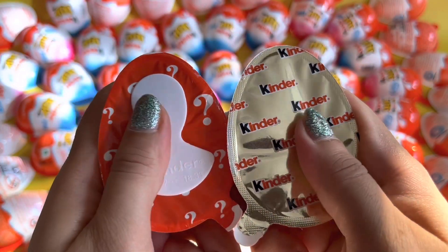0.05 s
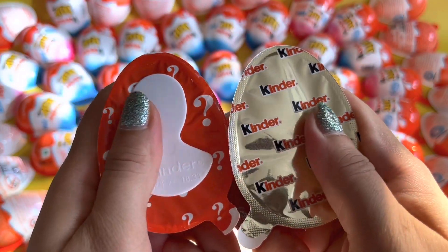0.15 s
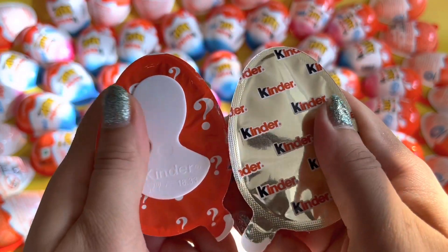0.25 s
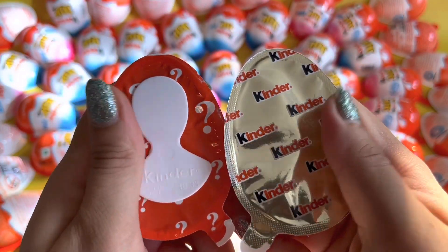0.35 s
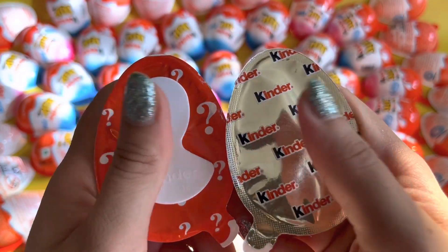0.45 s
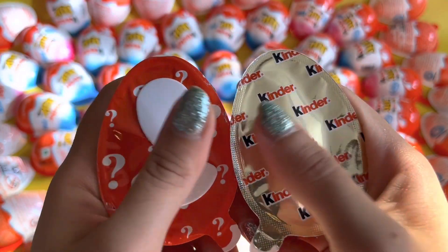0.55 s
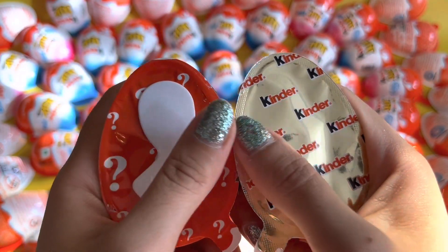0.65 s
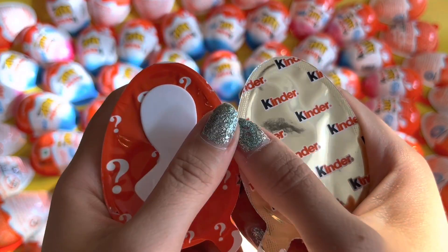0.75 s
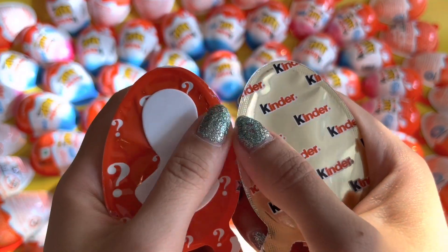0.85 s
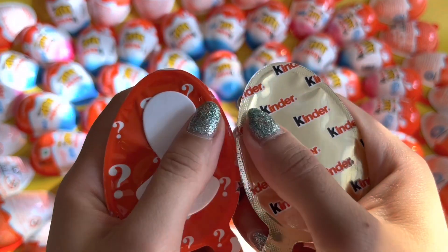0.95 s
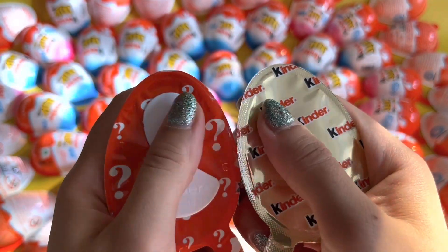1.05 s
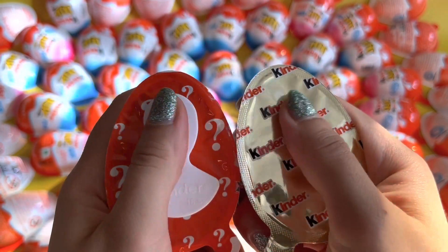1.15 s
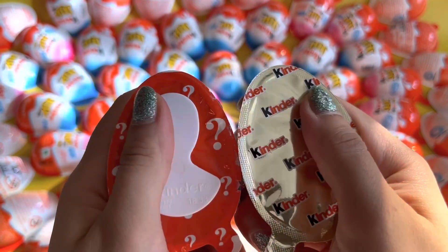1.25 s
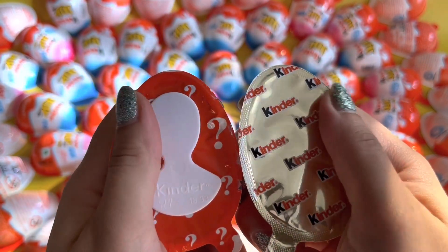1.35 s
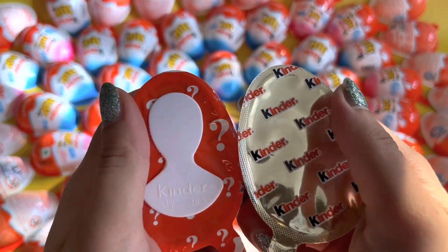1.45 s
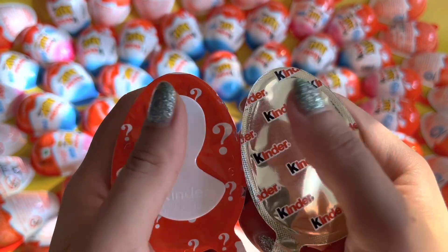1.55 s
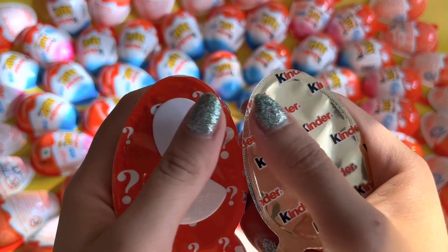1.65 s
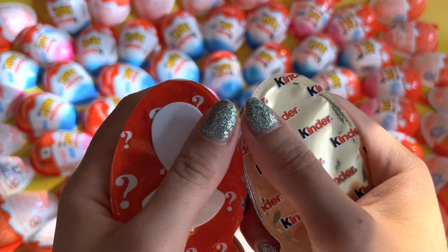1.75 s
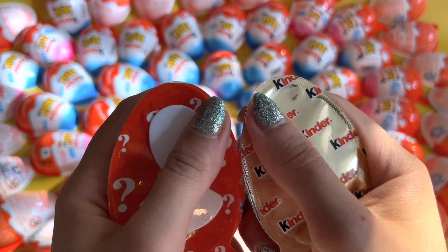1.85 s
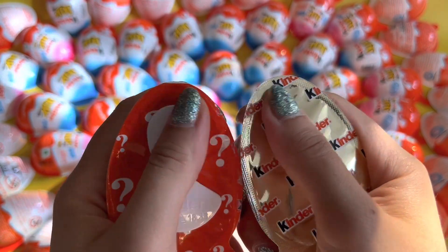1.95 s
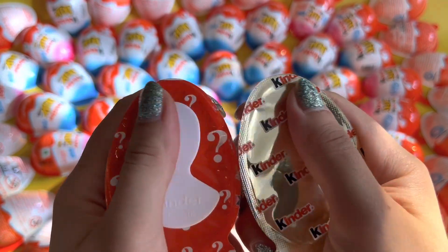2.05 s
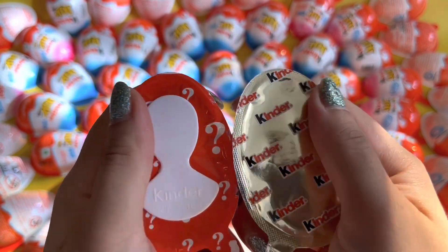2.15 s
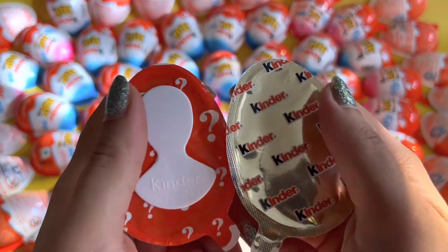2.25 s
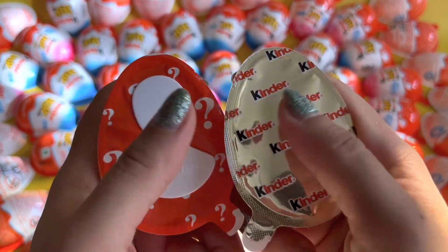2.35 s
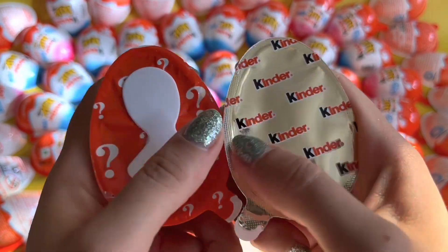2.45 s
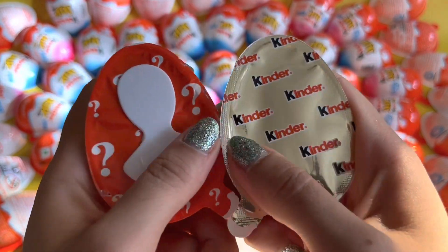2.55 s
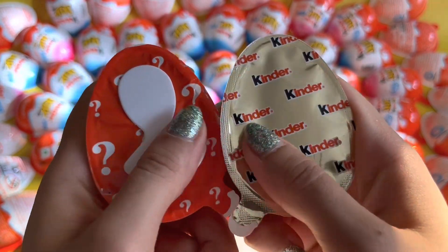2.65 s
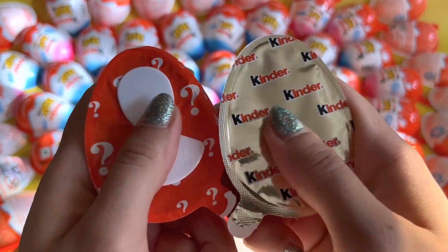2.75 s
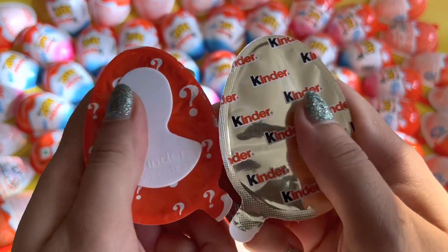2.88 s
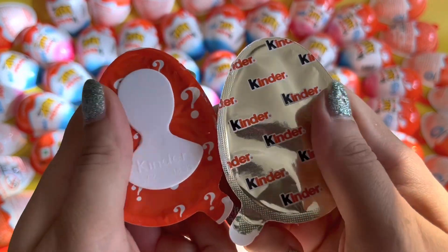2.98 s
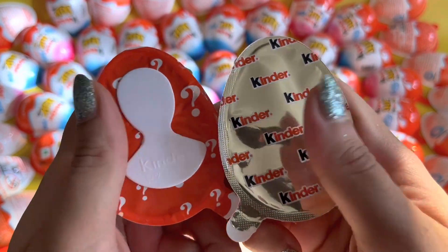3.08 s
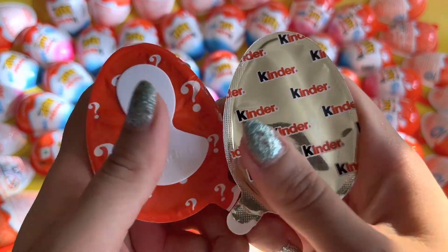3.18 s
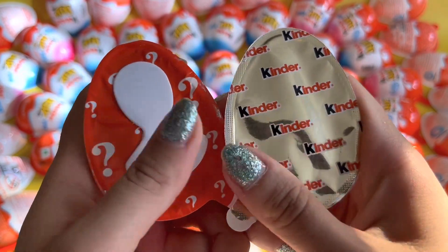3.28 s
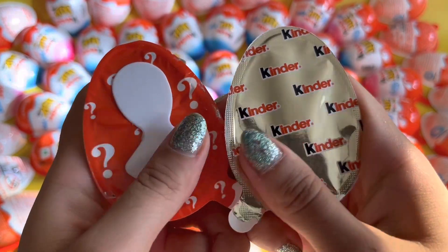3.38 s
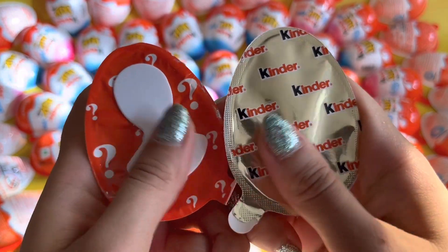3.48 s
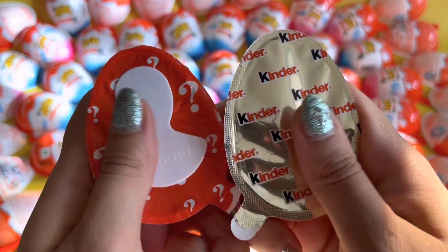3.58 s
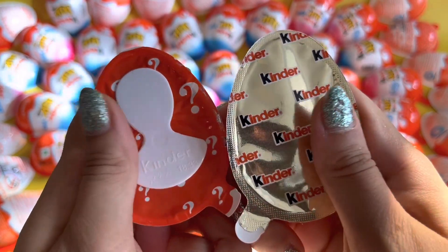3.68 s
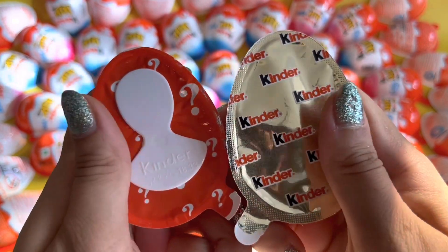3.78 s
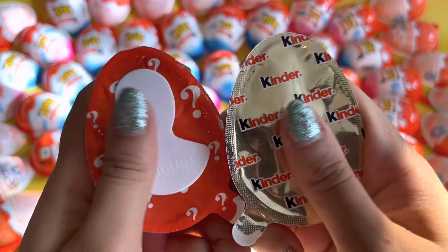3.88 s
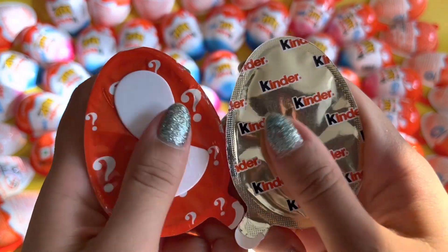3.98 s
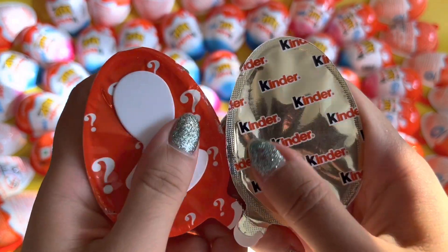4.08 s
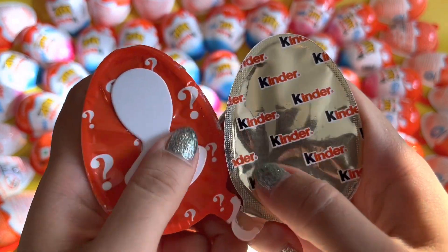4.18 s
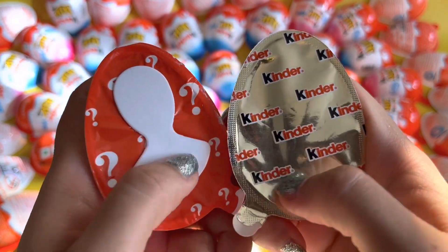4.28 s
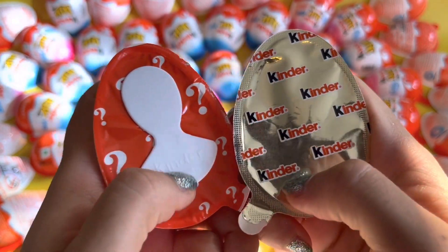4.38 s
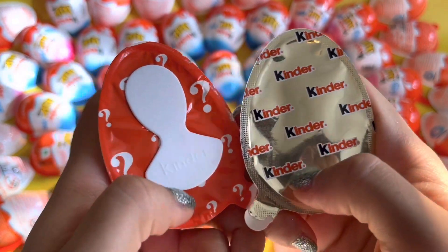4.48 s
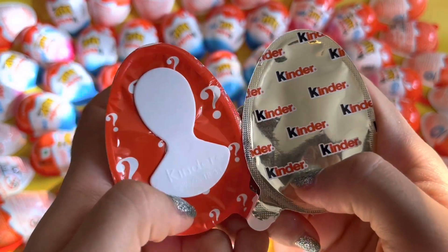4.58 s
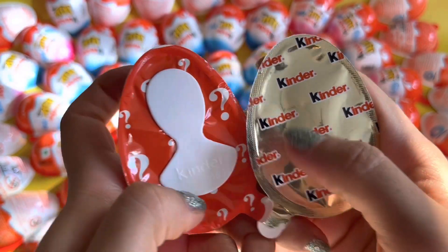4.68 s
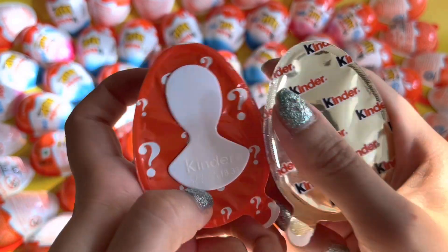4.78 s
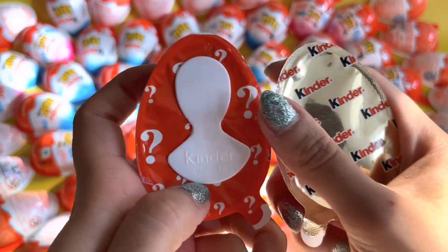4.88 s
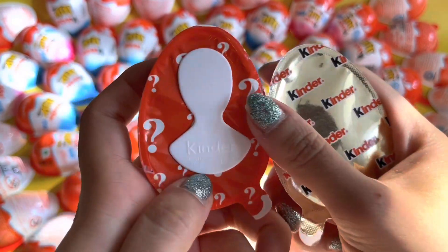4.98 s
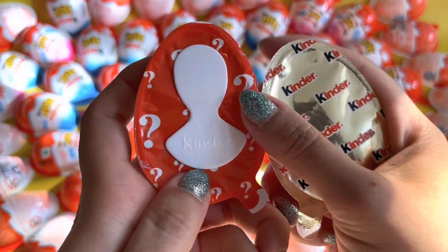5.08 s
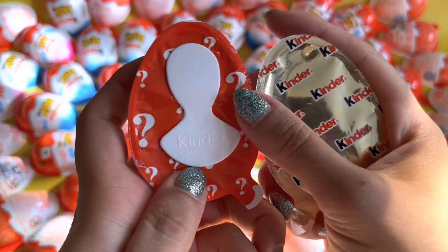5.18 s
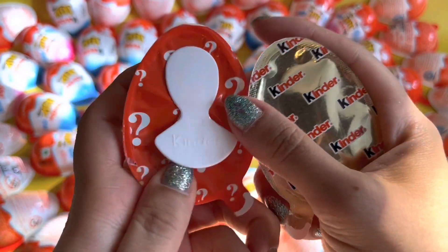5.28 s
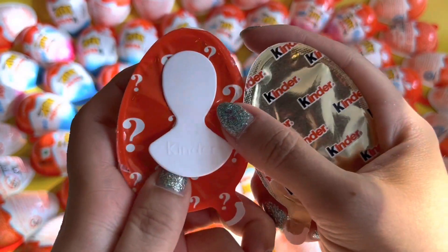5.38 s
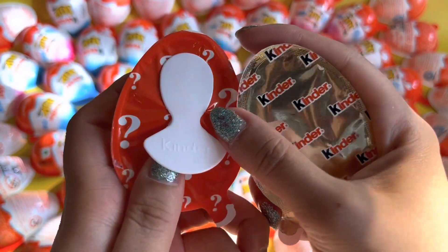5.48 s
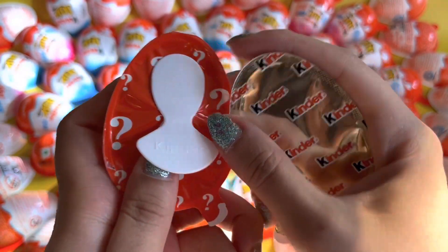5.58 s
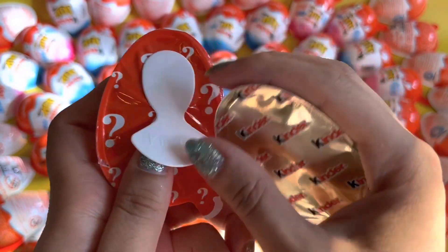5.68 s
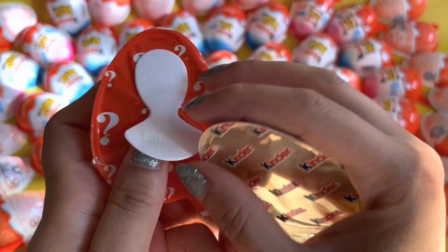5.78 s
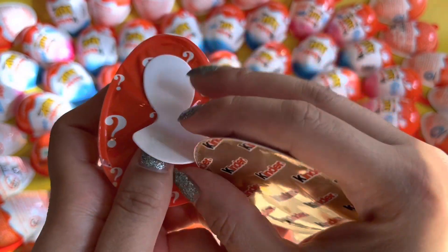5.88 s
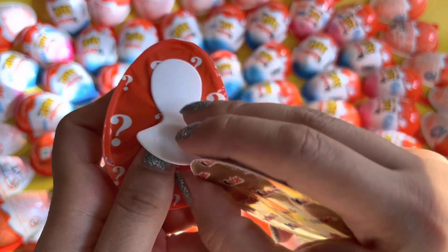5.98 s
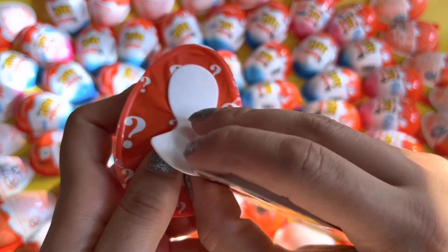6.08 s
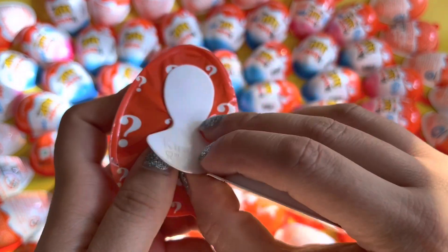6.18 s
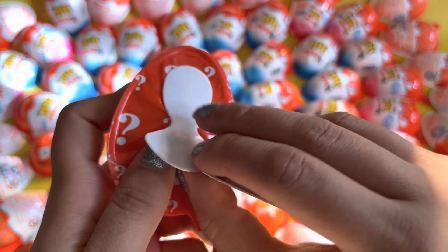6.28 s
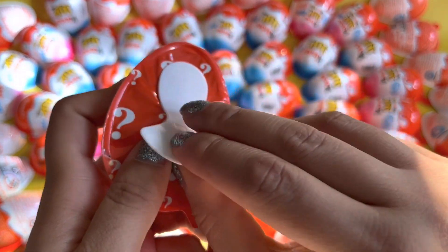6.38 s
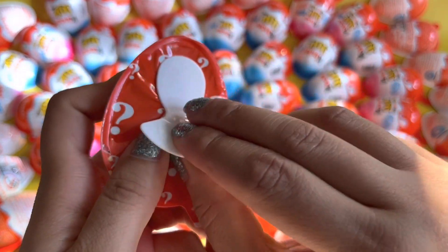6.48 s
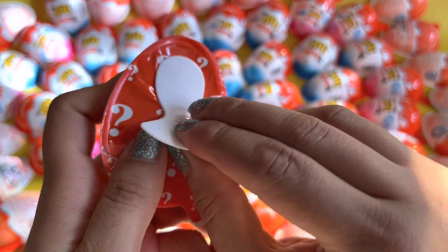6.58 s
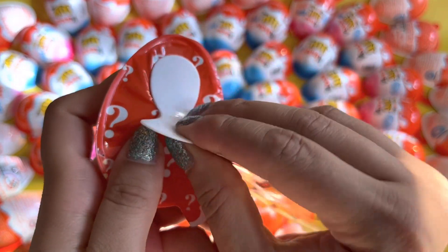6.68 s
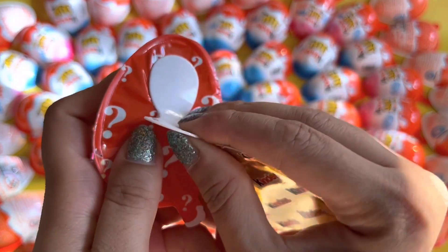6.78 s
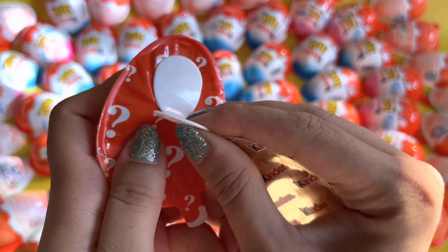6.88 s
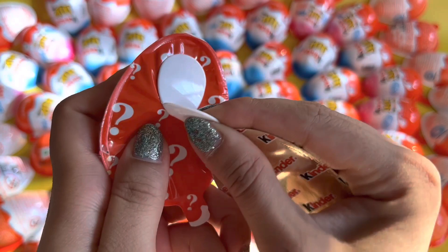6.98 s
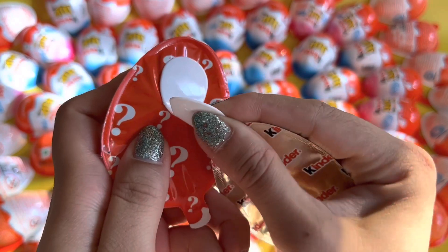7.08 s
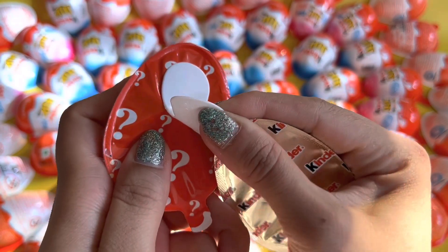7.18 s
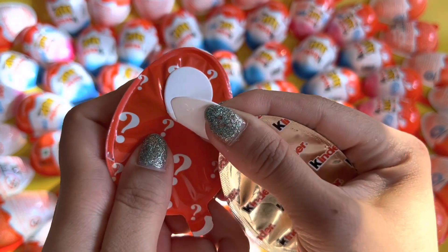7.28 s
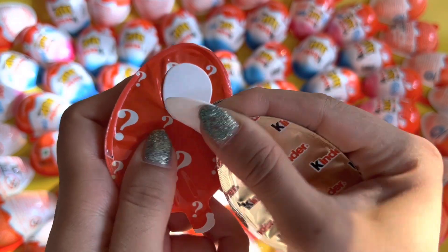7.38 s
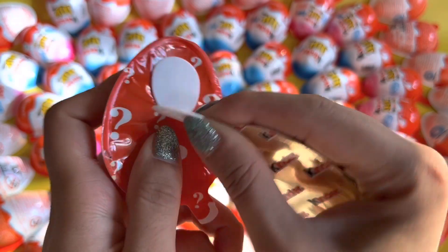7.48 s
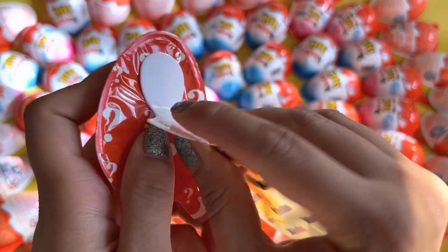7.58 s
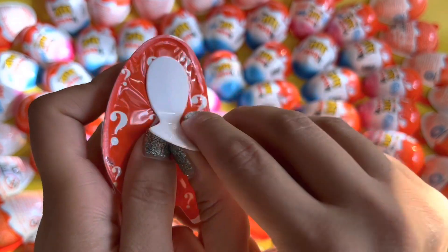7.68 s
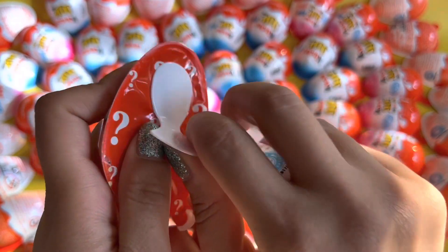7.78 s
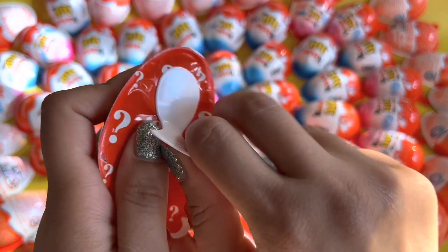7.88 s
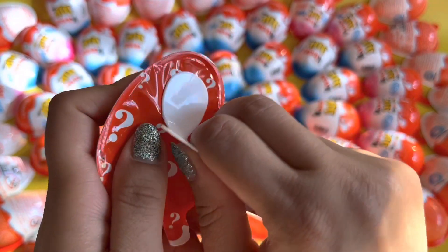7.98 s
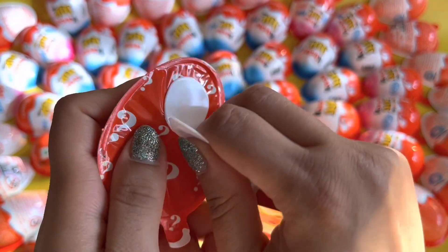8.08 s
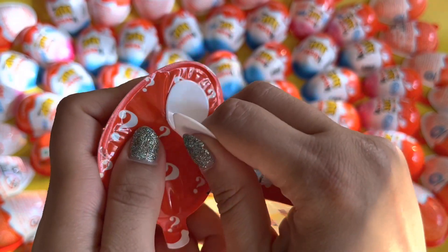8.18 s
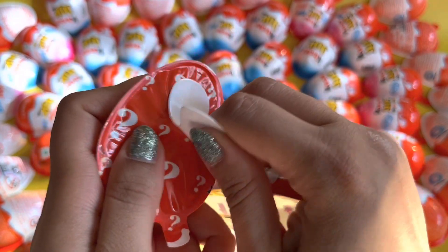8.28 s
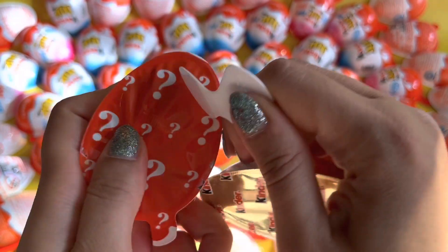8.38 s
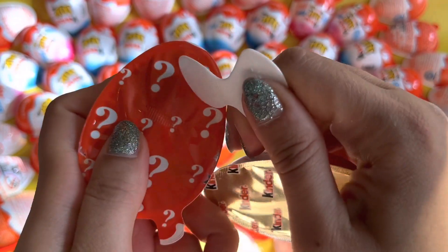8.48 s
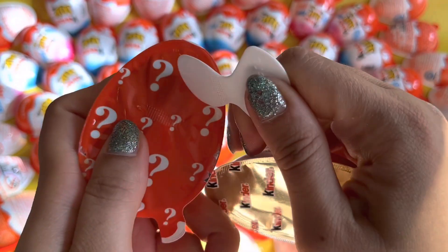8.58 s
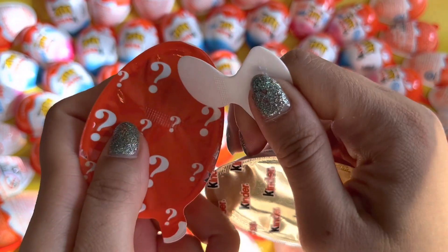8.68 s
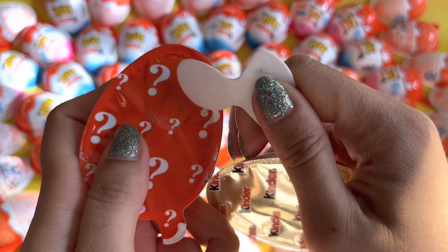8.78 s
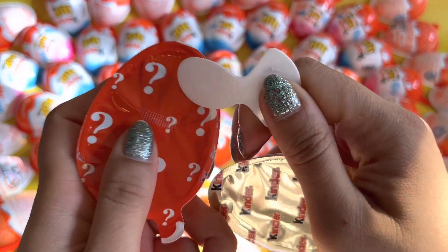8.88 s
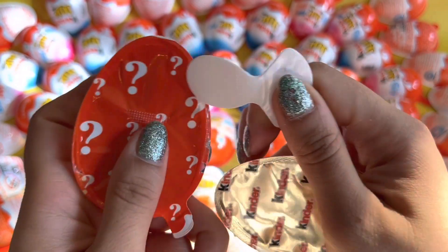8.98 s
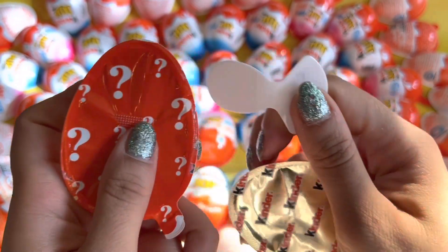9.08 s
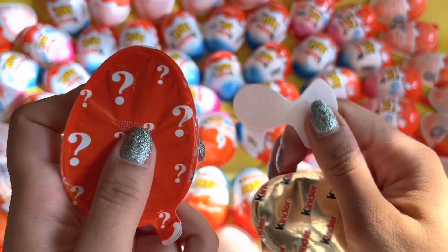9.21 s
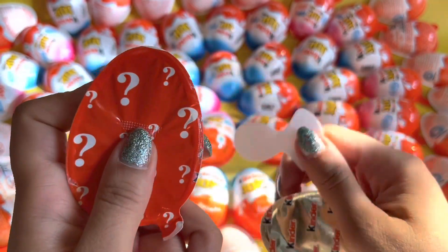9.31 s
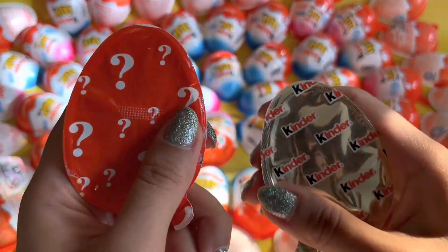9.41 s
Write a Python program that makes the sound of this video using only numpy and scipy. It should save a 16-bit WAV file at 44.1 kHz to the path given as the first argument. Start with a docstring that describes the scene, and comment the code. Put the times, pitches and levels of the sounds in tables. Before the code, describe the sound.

Close, detailed, almost dry stereo in a small room with low rumble and soft hum. From 0 to about 4.2 s thumbs press and stroke the foil lids of a halved plastic egg: irregular, crisp snaps, strong around 0.4, 0.8, 1.9, 2.2, 2.8 and 3.05 s, with fine finger sliding and tiny crinkles between, and short quieter gaps. From 4.3 s duller handling and small scrapes join, with a bright snap near 4.5 s. At 5.3 s the halves part with a loud hollow pop and a low jolt. From 5.5 to 7.6 s come lighter clicks, small hollow knocks and rubbing as a plastic spoon is picked at. Snaps at 7.67 s lead into a rough, strong scrape near 7.95 s. At about 8.33 s the spoon rips free in a very short burst with a soft thump. Crisp snaps follow at 8.55 and 8.65 s, then faint rubbing and small clicks until about 9.2 s.

```python
"""Close to the microphone, two thumbs press the foil lids of a halved plastic candy egg, which buckle in dry snaps:
each snap is a burst of tiny slips shaped by broad resonances of foil and cup. One half is bent away with a hollow
pop of decaying sines; a small plastic spoon is picked at, rubbed and torn off its lid in runs of coloured grains.
Fingers slide on the plastic in between; the small room adds a faint noise tail and hums softly."""
import sys
import numpy as np
from scipy import signal
from scipy.fft import rfft, irfft, next_fast_len
from scipy.io import wavfile
from scipy.ndimage import uniform_filter1d

SR = 44100
rng = np.random.default_rng(int(sys.argv[2]) if len(sys.argv) > 2 else 0)


def file_out(sig):
    """Save sig as 16-bit WAV at sys.argv[1]."""
    # one column per channel
    cols = np.atleast_2d(sig).T
    # limit, then scale
    lim = np.clip(cols, -1, 1)
    pcm = np.round(lim * 32767).astype(np.int16)
    wavfile.write(sys.argv[1], SR, pcm)


N = 416744
FFT_SIZE = next_fast_len(N + SR // 2)
FFT_HZ = np.maximum(np.arange(FFT_SIZE // 2 + 1) * SR / FFT_SIZE, 1)

# finger strokes over lids and cups: start_s, end_s, slide_db (before the trim in sliding), grip_db (rustle of the cups)
STROKES = [(0.0, 0.312, -65.5, -87), (0.32, 0.39, -53.5, -80), (0.777, 0.905, -52, -73),
           (0.98, 1.068, -59.5, -78), (1.148, 1.284, -55.5, -77), (1.331, 1.46, -56, -80),
           (1.81, 2.223, -55.5, -76), (2.566, 2.773, -57.5, -78), (2.776, 2.88, -50, -69),
           (3.042, 3.107, -53.5, -68), (3.34, 3.619, -55, -66), (3.792, 3.92, -62, -65.5),
           (3.948, 4.305, -53.5, -68), (4.3, 4.527, -51.5, -52.5), (4.66, 4.733, -61.5, -66),
           (4.769, 4.819, -48, -50), (4.927, 5.00, -58, -67.5), (5.084, 5.132, -63, -83),
           (5.303, 5.317, -46, -66), (5.435, 5.482, -51.5, -54.5), (5.604, 5.647, -51, -67),
           (5.734, 5.955, -56, -65), (6.063, 6.195, -49.5, -52.5), (6.348, 6.413, -60, -58.5),
           (6.443, 6.547, -60.5, -55), (6.61, 6.646, -71, -52), (6.692, 6.853, -59, -66),
           (6.925, 7.21, -59, -68), (7.292, 7.31, -59.5, -73), (7.408, 7.63, -53.5, -67.5),
           (7.674, 8.18, -53, -59.5), (8.29, 8.41, -43.5, -65), (8.463, 8.664, -56.5, -56),
           (8.878, 9.038, -64, -75), (9.105, 9.21, -65, -63)]


def from_db(db):
    """Decibels to gain."""
    return 10 ** (np.asarray(db) / 20)


def rms_one(x):
    """Scale to an rms of 1."""
    return x / np.sqrt(np.mean(x ** 2) + 1e-20)


def at_hz(points, hz):
    """Read a table on a log-frequency axis."""
    points = np.array(points)
    return np.interp(np.log(hz), np.log(points[:, 0]), points[:, 1])


def band(x, low_hz, high_hz):
    """Causal band-pass."""
    sos = signal.butter(2, [low_hz, high_hz], "band", fs=SR, output="sos")
    return signal.sosfilt(sos, x + 1e-18)


def filtered(x, response):
    """Apply a frequency response."""
    return irfft(rfft(x, FFT_SIZE) * response, FFT_SIZE)[..., :N]


def coloured(x, spectrum):
    """Give a white signal a spectrum, keeping its power."""
    return filtered(x, rms_one(from_db(at_hz(spectrum, FFT_HZ))))


def grains(per_s, spread_db, size):
    """Random tiny slips, many weak and a few strong; rms 1."""
    strength = from_db(spread_db * np.minimum(rng.exponential(1, size), 4))
    strength = strength * rng.choice([-1, 1], size)
    happens = rng.random(size) < per_s / SR
    return rms_one(strength * happens)


def room_tone(level_db=-56, side_db=-13):
    """Low rumble, mostly alike in both channels, and faint steady hum lines."""
    # rumble spectrum: freq_hz, relative_db_per_hz
    rumble_colour = [(15, -27.5), (25, -13), (42, 1), (70, 3), (110, 1.5), (180, -6), (290, -15),
                     (400, -15.5), (485, -20.5), (600, -25.5), (800, -48), (1500, -38.5), (4000, -47),
                     (16000, -51.5)]
    # steady tones: freq_hz, rms_db
    hum_lines = [(49.5, -59), (253, -79), (388, -76), (588, -79)]
    mid, side = coloured(rng.standard_normal((2, N)), rumble_colour)
    rumble = from_db(level_db) * (mid + from_db(side_db) * side * [[1], [-1]])
    t = np.arange(N) / SR
    hum = sum(from_db(db) * np.sqrt(2) * np.sin(2 * np.pi * hz * t) for hz, db in hum_lines)
    return rumble + hum


def stroke_level(db_column, attack_s=0.012, release_db_per_s=186, rest_db=-77.5):
    """Each stroke sets in quickly, holds, and fades as the fingers stop, down to a resting floor; gain over time."""
    t = np.arange(0, N, 40) / SR
    level = np.full(len(t), from_db(rest_db))
    for (start_s, end_s, *_), db in zip(STROKES, db_column):
        attack = np.clip((t - start_s) / attack_s + .5, 0, 1)
        release_db = release_db_per_s * np.maximum(t - end_s, 0)
        level = np.maximum(level, attack * from_db(db - release_db))
    return np.interp(np.arange(N) / SR, t, level)


def crinkles(per_s, spread_db, count=8):
    """Tiny creases tick in a few pitch bands, weaker towards the treble; rms 1."""
    ticks = 0
    for hz in np.geomspace(1300, 6500, count):
        ticks = ticks + band(grains(per_s / count, spread_db, N), hz / 1.4, hz * 1.4) / hz ** .75
    return rms_one(ticks)


def sliding(slide, level_db=-3, per_s=5000, spread_db=4.0, crinkle_db=-4, waver_db=4.0, count=190):
    """Fingertips drag over the lids with uneven pressure: a fine grain and sparse crinkles."""
    # grain spectrum: freq_hz, relative_db_per_hz
    slide_colour = [(300, 4), (700, -14.5), (1700, 1), (3000, 1), (5000, -10), (7000, -7.5), (8500, -11),
                    (11500, -14.5), (14000, -16), (16000, -35)]
    pressure_db = waver_db * np.interp(np.arange(N), np.linspace(0, N, count), rng.standard_normal(count))
    ticks = crinkles(per_s=120, spread_db=5)
    grain = coloured(grains(per_s, spread_db, N), slide_colour)
    return slide * from_db(level_db + pressure_db) * (grain + from_db(crinkle_db) * ticks)


def grip(level, low_hz=190, high_hz=800):
    """Skin sticks and slips on the hollow cups with a dull rustle."""
    slips = grains(per_s=1200, spread_db=6.5, size=N)
    return level * rms_one(band(slips, low_hz, high_hz))


def resonance(hz, low_hz, high_hz):
    """Power response of a broad resonance; its sum is 1."""
    power = 1 / (1 + ((hz * hz - low_hz * high_hz) / (hz * (high_hz - low_hz))) ** 4)
    return power / power.sum()


def causal(gain):
    """The minimum-phase response with this gain: it rings only after it is struck."""
    cepstrum = irfft(np.log(gain + 1e-12))
    fold = 1 + np.sign(np.fft.fftfreq(len(cepstrum)))
    return np.exp(rfft(cepstrum * fold))


def slip_duration_ms(knock_db, sharp_db):
    """A harder knock, up to the ring's level, means a longer slip; a very sharp fold is over sooner."""
    base_ms, doubling_db = 1.72, 22
    sharp_from_db, knock_db_per_sharp_db = -7.5, 0.8
    shortening_db = knock_db_per_sharp_db * max(sharp_db - sharp_from_db, 0)
    return base_ms * 2 ** ((min(knock_db, 0) - shortening_db) / doubling_db)


def slip_force(ms, slip_ms):
    """Creases creep, the dent flips at 0 ms and more creases follow."""
    after_ms = 1.88 * slip_ms
    before_ms = .5 + .6 * slip_ms
    envelope = np.exp(-(ms / np.where(ms < 0, before_ms, after_ms)) ** 2)
    creases = grains(7000, 3.4, len(ms)) * envelope
    flip = (ms == 0) * rng.choice([-1, 1])
    return flip + creases / (np.linalg.norm(creases) + 1e-9) * np.sqrt(after_ms)


def snaps(rows, ring_width=1.276, pan_spread_db=1.4, size=2048):
    """Each snap strikes a patch of foil or plastic that rings for a few cycles at its own pitch, and the cup
    beneath it."""
    knock_hz, crack_hz, tick_hz = (620, 1250), (2400, 5300), (6500, 13000)
    # level against the ring at sharpness 0, and dB gained per dB of sharpness
    crack_db, crack_per_sharp = -3, 0.86
    tick_db, tick_per_sharp = -14.5, 1.27
    out, flip = np.zeros((2, N + size)), size // 4
    ms = (np.arange(size) - flip) / SR * 1000
    hz = np.fft.rfftfreq(size, 1 / SR) + 1
    level_window = .005 * SR  # ring level is the rms over 5 ms
    for s, ring_db, ring_hz, knock_db, sharp_db in rows:
        force = rfft(slip_force(ms, slip_duration_ms(knock_db, sharp_db)))
        # even on the whole, with fine ripple
        force = force / np.sqrt(uniform_filter1d(np.abs(force) ** 2, size=41))
        parts = [((ring_hz / ring_width, ring_hz * ring_width), 0),
                 (knock_hz, knock_db),
                 (crack_hz, crack_db + crack_per_sharp * sharp_db),
                 (tick_hz, tick_db + tick_per_sharp * sharp_db)]
        power = sum(from_db(ring_db + db) ** 2 * resonance(hz, *edges) for edges, db in parts)
        struck = rms_one(irfft(force * causal(np.sqrt(power))))
        # creases lie a little to the left or right
        pan = from_db(pan_spread_db * rng.standard_normal() * np.array([[.5], [-.5]]))
        at = max(round(s * SR) - flip, 0)
        out[:, at:at + size] += pan * struck * np.sqrt(power.sum() * level_window / size)
    return out[:, :N]


def faint_snaps(slide, per_s=5.1, over_slide_db=5.5, spread_db=3, colour_spread_db=5, count=400):
    """Snap rows for small creases giving way at random, as loud as the sliding allows."""
    typical_hz, spread_octaves = 2500, .35
    typical_knock_db, typical_sharp_db = -11, -7
    s, chance = rng.random((count, 2)).T * [[(N - 1) / SR], [1]]
    size, pitch, knock, sharp = np.clip(rng.standard_normal((count, 4)), -2, 2).T
    ring_db = 20 * np.log10(slide[(s * SR).astype(int)]) + over_slide_db + spread_db * size
    ring_hz = typical_hz * 2 ** (spread_octaves * pitch)
    knock_db = typical_knock_db + colour_spread_db * knock
    sharp_db = typical_sharp_db + colour_spread_db * sharp
    rows = np.transpose([s, ring_db, ring_hz, knock_db, sharp_db])
    return rows[chance < per_s * N / SR / count]


def room(x, first_echo_s=0.0079, likeness=0.33):
    """A faint diffuse noise tail, partly alike at both ports, with its own decay time in each band."""
    # decay time: freq_hz, t60_s
    decay_times = [(200, 0.37), (1500, 0.36), (4000, 0.096), (12000, 1)]
    # tail level: freq_hz, level_db against the direct sound
    send_levels = [(200, -19.5), (1000, -23), (2300, -24), (4500, -20), (8500, -36.5), (12000, -32),
                   (16000, -30)]
    t, tail = np.arange(SR // 2) / SR, 0
    edges_hz = np.geomspace(120, 16000, 11)
    for low, high in zip(edges_hz, edges_hz[1:]):
        hz = np.sqrt(low * high)
        decay = np.exp(-np.log(1000) * t / at_hz(decay_times, hz)) * (t > first_echo_s)
        noise = band(rng.standard_normal((3, len(t))), low, high)
        noise = np.sqrt(likeness) * noise[2] + np.sqrt(1 - likeness) * noise[:2]
        tail = tail + from_db(at_hz(send_levels, hz)) * noise * decay / np.linalg.norm(decay)
    return filtered(x, rfft(tail, FFT_SIZE))


def pops(pop_t60_s=0.033):
    """The whole cup springs over and its low modes die quickly in the hand; a sudden release jolts the hands too."""
    # hollow pops of the flexing cup: start_s, pitch_hz, start_amplitude_db
    cup_pops = [(3.544, 360, -39), (3.588, 333, -34), (4.362, 384, -41), (5.2989, 411, -13),
                (5.806, 401, -34), (5.813, 327, -34), (6.069, 350, -35), (6.223, 405, -35),
                (6.645, 392, -47), (7.672, 436, -34), (7.801, 420, -36.5), (8.337, 306, -32.5)]
    # hands recoil as the halves part and the spoon comes free: start_s, base_hz, base_db (before mode factors)
    recoils = [(5.301, 209, -24.5), (8.341, 109.7, -22.5)]
    # modes of a recoil: pitch_share of base_hz, level_db against base_db, t60_s, delay_cycles of base_hz
    recoil_modes = [(0.78, 1, .049, 0.067), (0.36, -9.5, 0.023, .9)]
    modes = [(s, hz, db, pop_t60_s) for s, hz, db in cup_pops]
    for s, hz, db in recoils:
        for share, mode_db, t60_s, cycles in recoil_modes:
            modes.append((s + cycles / hz, hz * share, db + mode_db, t60_s))
    out, t = np.zeros(N), np.arange(SR // 4) / SR
    for s, hz, db, t60_s in modes:
        at = round(s * SR)
        decay = np.exp(-np.log(1000) * t / t60_s)
        out[at:at + len(t)] += from_db(db) * np.sin(2 * np.pi * hz * t) * decay
    return out


def scrapes(spread_db=4.5, treble_hz=4500, swell_share=0.72):
    """Nails and spoon stick and slip on the lids in runs that swell and stop; a harder run slips faster."""
    # runs: top_s (strongest), length_s, level_db (at the top, before colouring), treble_db (gain above treble_hz)
    runs = [(4.337, 0.038, -38, -5.5), (4.456, 0.063, -42, -4), (4.549, 0.029, -50, 6.5),
            (4.673, 0.023, -40, -25.5), (4.773, 0.018, -54, -8), (4.817, 0.036, -49, -3),
            (5.32, 0.055, -34, -18), (5.781, 0.026, -44, -7), (5.816, 0.038, -41, -19),
            (6.161, 0.082, -39, -15), (6.36, 0.02, -54, 0), (6.49, .11, -50.5, -21),
            (7.323, 0.089, -50, -26), (7.764, .04, -47.5, -1.5), (7.96, 0.15, -25, -18.5),
            (8.037, 0.022, -39.5, -6.5), (8.237, .025, -55, 7), (9.005, .16, -51.5, -1.5)]
    # spectrum: freq_hz, relative_db_per_hz
    scrape_colour = [(200, -19), (600, -12), (1200, -7), (2100, 0), (3600, -1), (5500, -7), (8500, -14),
                     (12000, -11), (14000, -14), (16000, -26)]
    fastest_per_s, rate_halving_db = 4500, 7
    out, hardest_db = np.zeros(N), max(db for _, _, db, _ in runs)
    for top_s, length_s, db, treble_db in runs:
        start_s = top_s - swell_share * length_s
        end_s = start_s + length_s
        at = np.arange(round(start_s * SR), round(end_s * SR))
        per_s = fastest_per_s * 2 ** ((db - hardest_db) / rate_halving_db)
        swell = np.interp(at / SR, [start_s, top_s, end_s], [0, 1, 0]) ** 2
        run = grains(per_s, spread_db, len(at)) * swell
        dull = signal.lfilter(*signal.butter(1, treble_hz, fs=SR), run)
        out[at] += from_db(db) * (dull + from_db(treble_db) * (run - dull))
    return coloured(out, scrape_colour)


def rip():
    """The glue under the spoon tears: threads of like strength break within a fiftieth of a second."""
    # level over time: time_s, level_db
    rip_level = [(8.3225, -45), (8.326, -16), (8.331, -16), (8.335, -16), (8.338, -11), (8.340, -20),
                 (8.343, -42)]
    # spectrum: freq_hz, relative_db_per_hz
    rip_colour = [(200, -4.5), (700, -7.5), (1800, 0), (3800, -8), (6500, -4), (8500, -5.5), (11000, -8),
                  (14000, -11.5), (16000, -25)]
    time_s, db = np.transpose(rip_level)
    level = from_db(np.interp(np.arange(N) / SR, time_s, db, left=-200, right=-200))
    return coloured(level * grains(per_s=9000, spread_db=1, size=N), rip_colour)


def ports(x):
    """The two microphone ports hear the near hands with different colour and phase."""
    # right port against the left: freq_hz, level_db, phase_lead_rad
    right_port = [(50, -.3, -.1), (500, -4, -.4), (1200, -8, -.4), (1480, -7, -2.3), (1632, -2.5, -2.5),
                  (1678, 0, -.1), (1830, .7, -.1), (2400, -4, -.7), (3300, -6.5, -1.1), (5000, -2, .2),
                  (7000, -1, 1.7), (10000, 1, 4.7), (16000, 1, 9.7)]
    hz, db, lead_rad = np.transpose(right_port)
    response = from_db(np.interp(FFT_HZ, hz, db)) * np.exp(1j * np.interp(FFT_HZ, hz, lead_rad))
    return np.array([x[0], filtered(x[1], response)])


def scene():
    """The egg in the hands, its faint echo and the room tone."""
    # foil snaps, and from about 5.5 s clicks of the plastic spoon: start_s, ring_db (rms over 5 ms), ring_hz,
    # knock_db (cup against ring), sharpness_db
    snap_rows = [(0.0155, -46.5, 1860, -10.5, -16), (0.0564, -23, 1383, -12, -18),
                 (0.0934, -30, 2160, -16.5, -18.5), (0.1011, -23.5, 2513, -29.5, -14.5),
                 (0.3036, -39, 2760, -11.5, -23), (0.3285, -28.5, 1490, -14, -1),
                 (0.3338, -21, 1857, -16.5, -33), (0.3638, -15, 1817, -14.5, -0.5),
                 (0.3756, -36.5, 1954, -14.5, -2), (0.774, -24.5, 1893, -37.5, -25),
                 (0.7848, -18, 2146, -29.5, -24), (0.8231, -11.5, 1590, -18, -10),
                 (0.8305, -16, 2238, -30.5, -10.5), (0.8525, -23.5, 1536, -29.5, -15),
                 (0.9115, -41, 2130, 4, -13.5), (1.0245, -36, 1150, -11, -31),
                 (1.0439, -34, 1782, -14.5, -24), (1.2066, -27, 1910, -19, -40.5),
                 (1.253, -26, 1710, -17.5, -5.5), (1.2659, -34, 1780, -16, -17.5),
                 (1.2796, -34.5, 1640, -19, -25), (1.3355, -46, 2460, -12, -11),
                 (1.3512, -28.5, 1996, -16, -28), (1.3698, -21.5, 1676, -22, -38),
                 (1.4599, -34, 2860, -15, -17.5), (1.7753, -24.5, 1820, -33.5, -19.5),
                 (1.7985, -24, 2550, -4, -20.5), (1.8139, -20, 1835, -26.5, -17),
                 (1.8636, -13.5, 1499, -16, -4), (2.028, -30, 1946, -18, -33.5),
                 (2.1447, -24.5, 1630, -36.5, -45), (2.2, -16.5, 1745, -20.5, -8),
                 (2.2041, -19.5, 1536, -27.5, -14), (2.533, -51.5, 1900, -14, -10),
                 (2.644, -34, 1620, -20, -31), (2.6583, -29.5, 1437, -13, -36),
                 (2.6789, -25.5, 1773, -17.5, -17), (2.7501, -44.5, 1840, -5.5, -13.5),
                 (2.8022, -19, 2570, -19, -3.5), (2.806, -23, 2006, -18.5, -9.5),
                 (2.83, -31, 2030, -4.5, -11), (2.8495, -18.5, 1754, -15.5, -6.5),
                 (2.8587, -25, 2350, -7, -18), (2.9012, -24.5, 1845, -15, -9.5),
                 (3.014, -27.5, 1774, -16, -45), (3.0537, -16, 2075, -29.5, -8),
                 (3.1049, -20, 1650, -23.5, -4.5), (3.2132, -46, 2220, -14, -10),
                 (3.3403, -26.5, 2090, -9, -11), (3.3487, -18.5, 1577, -17, -2.5),
                 (3.4019, -23.5, 1760, -28, -10), (3.4204, -28.5, 1464, -12.5, -7),
                 (3.5057, -23, 1884, -18, -9.5), (3.5322, -32.5, 2100, -14, -18),
                 (3.5454, -29, 1240, 2.5, -21.5), (3.5895, -23, 1726, -10, -11),
                 (3.7937, -34, 1770, -19.5, -8), (3.8073, -24, 1940, -23, -11.5),
                 (3.8195, -30, 1790, -16, -36), (3.9542, -27, 1810, -25, -25.5),
                 (3.962, -21.5, 2037, -16, -3), (3.9935, -18.5, 1890, -19.5, -17.5),
                 (4.0378, -19.5, 1894, -16.5, -5.5), (4.1084, -30, 1840, -7, -27),
                 (4.1717, -36.5, 1860, -15, -25.5), (4.2416, -47.5, 3200, -20.5, 8),
                 (4.3232, -38, 3020, -6, -13.5), (4.3345, -38.5, 2500, -8.5, -11),
                 (4.3426, -35, 1770, -4.5, -10.5), (4.363, -26.5, 1684, -2.5, 3.5),
                 (4.4166, -40.5, 2450, -1, 5), (4.425, -42, 1340, -6, 3.5), (4.4805, -11, 1686, -17.5, -15),
                 (4.5141, -29.5, 1690, -9, -5.5), (4.569, -39.5, 1630, -2, -15),
                 (4.6713, -45, 2400, 1.5, -16), (4.777, -38.5, 1530, -7.5, -15.5),
                 (4.9357, -44, 1870, -15, -35), (5.0883, -35, 2080, -12.5, -22), (5.2988, -17, 2520, -1, -2),
                 (5.3072, -22, 1780, -3.5, -7), (5.3275, -27, 1450, -13, -17), (5.4772, -25, 1360, -8, -15.5),
                 (5.5608, -24, 1264, -20, -2.5), (5.651, -25.5, 1374, -17, -2.5),
                 (5.7631, -43.5, 1250, -4, -10), (5.8149, -28.5, 1410, -57, -32),
                 (5.9305, -26, 1620, -25, 2.5), (6.0684, -29.5, 2500, -7, -7.5),
                 (6.0878, -39.5, 1800, -20, -5), (6.1472, -38.5, 1460, -16, -11),
                 (6.1606, -35.5, 1250, -8, 14.5), (6.184, -38, 2010, -4.5, -1), (6.223, -27, 1610, -7, -22),
                 (6.3135, -50, 2460, -4, -31.5), (6.501, -33, 1680, -6.5, -17), (6.5199, -32, 1960, -4, -3.5),
                 (6.6267, -28, 1190, -19, -44.5), (6.6463, -35, 2050, 2.5, -4), (6.6968, -31, 2450, -10, 2.5),
                 (6.7372, -49, 1880, 4, -20), (6.7693, -26.5, 1780, -5, -3), (6.7908, -37, 2980, -11.5, -26),
                 (6.8475, -45.5, 2580, -1, 15.5), (6.8882, -42, 2060, -1, -9), (6.9021, -49, 2570, -7, 7),
                 (6.9436, -33.5, 1907, -6.5, -4), (6.9742, -40.5, 1460, -7, 9.5),
                 (7.0058, -32.5, 1760, -12.5, -2.5), (7.0155, -39.5, 1790, -20.5, 15.5),
                 (7.0331, -46.5, 1820, -9, 9), (7.06, -42, 2320, -6.5, 15), (7.1127, -43, 1430, 8, -23),
                 (7.1248, -47.5, 1620, -12, 5), (7.1705, -28.5, 2025, -3.5, 3), (7.2055, -39, 1870, 4, -24),
                 (7.4443, -39.5, 2020, -12, -8.5), (7.4532, -34.5, 2200, -12, -6),
                 (7.5086, -29, 1517, -10, 0.5), (7.6485, -22.5, 2090, -11, -4),
                 (7.672, -16.5, 1778, -12, 1.5), (7.7011, -38, 1620, -1, 4), (7.8028, -23, 1970, -7.5, -7.5),
                 (7.8773, -24.5, 2070, -11.5, -18), (7.9532, -27.5, 2106, -10, -4),
                 (7.9753, -24.5, 2660, -15.5, -16), (7.9842, -25.5, 2580, -12.5, -9.5),
                 (8.0089, -30.5, 2374, -14.5, -23), (8.0266, -31.5, 2416, -8, -28),
                 (8.0998, -29, 2210, -5, 4.5), (8.1101, -25.5, 1872, -24.5, -7),
                 (8.1339, -26.5, 2860, -26, -28), (8.1663, -33, 1452, -9.5, 11),
                 (8.2008, -51.5, 2120, -1.5, 21), (8.2604, -48.5, 1820, -13, 18),
                 (8.2731, -45.5, 1607, -1, 21), (8.2892, -37.5, 3200, -24.5, 3.5),
                 (8.2953, -35, 3130, -16, 6.5), (8.3103, -17, 2310, -24, -7.5), (8.3157, -14, 2220, -29, -10),
                 (8.3237, -26, 2207, -9.5, -4.5), (8.3816, -31, 1490, -11, -3.5),
                 (8.3911, -37.5, 1650, -9, -4.5), (8.4133, -26, 1280, -10, -2.5),
                 (8.4624, -31, 1610, -11.5, 9), (8.5312, -31.5, 1770, -12.5, -27),
                 (8.5517, -18.5, 1850, -14, -10), (8.5785, -25.5, 2640, -9, 8), (8.6303, -28.5, 1430, -8, 13),
                 (8.6454, -13.5, 1838, -19, 0), (9.0932, -46.5, 2540, 0.5, -26.5),
                 (9.1698, -28.5, 1720, -18.5, -42), (9.2003, -26, 1410, -34.5, -18)]
    _, _, slide_db, grip_db = np.transpose(STROKES)
    slide = stroke_level(slide_db)
    egg = sliding(slide) + grip(stroke_level(grip_db))
    egg = egg + snaps(snap_rows) + snaps(faint_snaps(slide))
    egg = egg + pops() + scrapes() + rip()
    return ports(egg) + room(egg.mean(axis=0)) + room_tone()


def record(dry, bass_hz=36, air_hz=14800, cutoff_hz=16500):
    """The deepest bass is dropped; the microphone's top rolls off and is then cut steeply."""
    lean = signal.sosfilt(signal.butter(3, bass_hz, "high", fs=SR, output="sos"), dry)
    soft = signal.sosfilt(signal.butter(6, air_hz, fs=SR, output="sos"), lean)
    return signal.sosfiltfilt(signal.butter(16, cutoff_hz, fs=SR, output="sos"), soft)


dry = scene()
out = record(dry)
file_out(out)
```